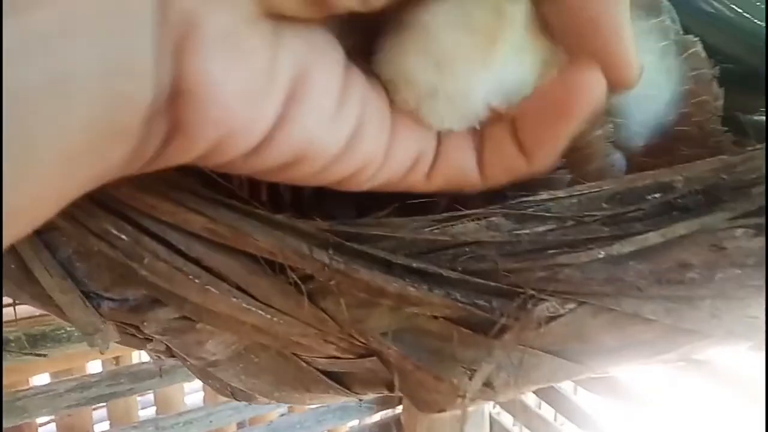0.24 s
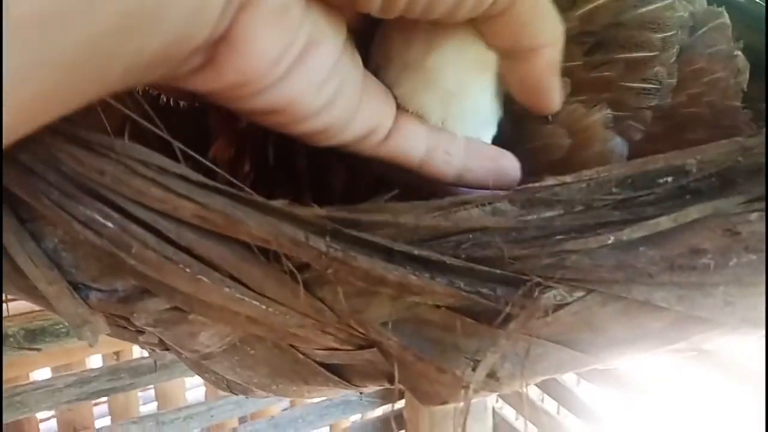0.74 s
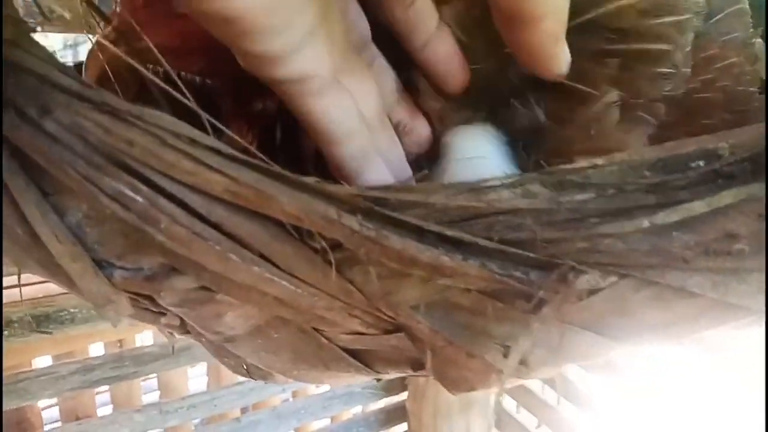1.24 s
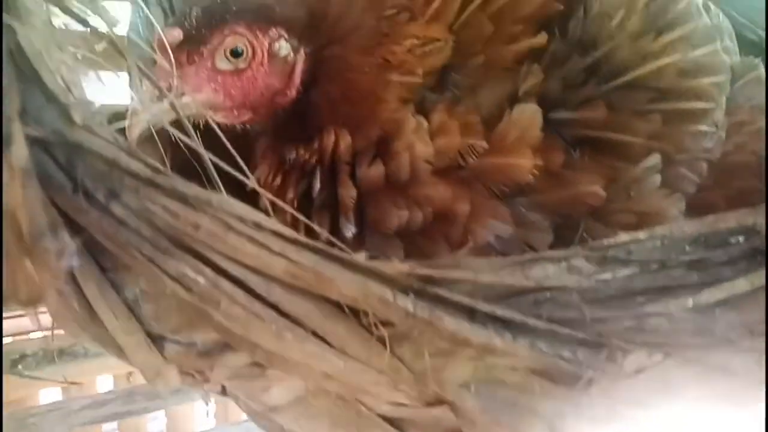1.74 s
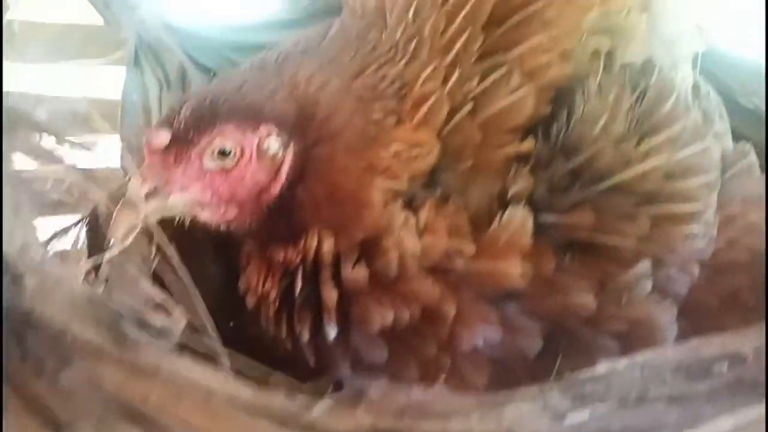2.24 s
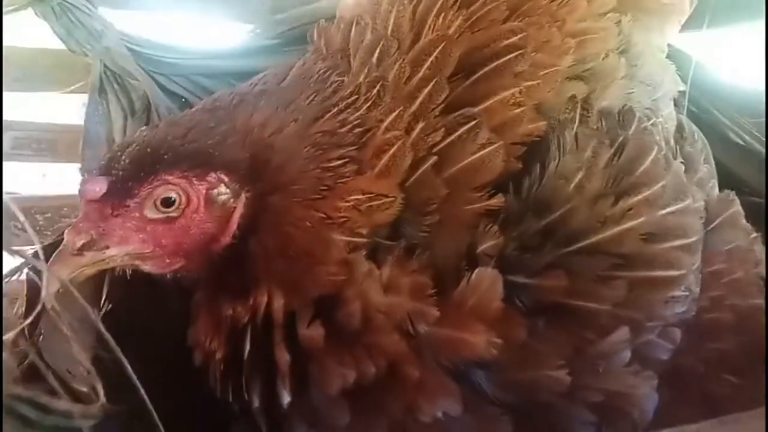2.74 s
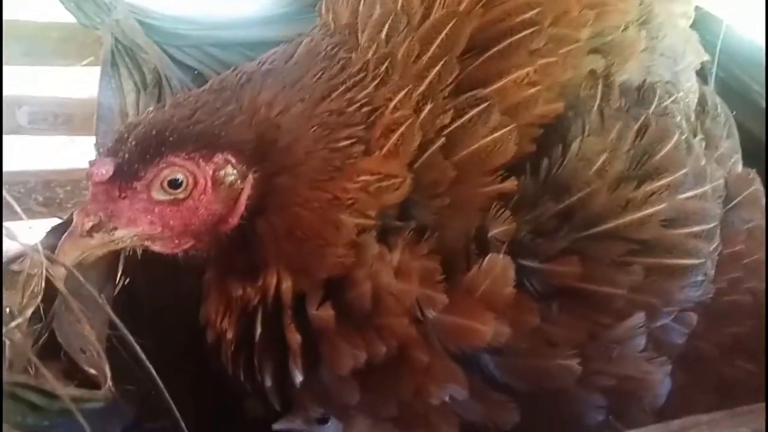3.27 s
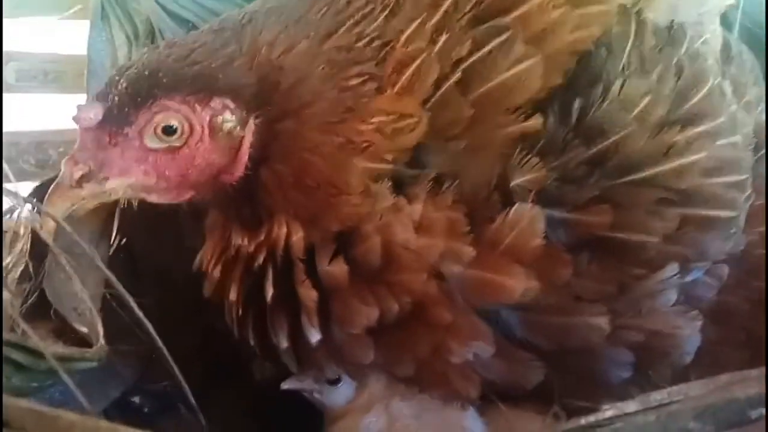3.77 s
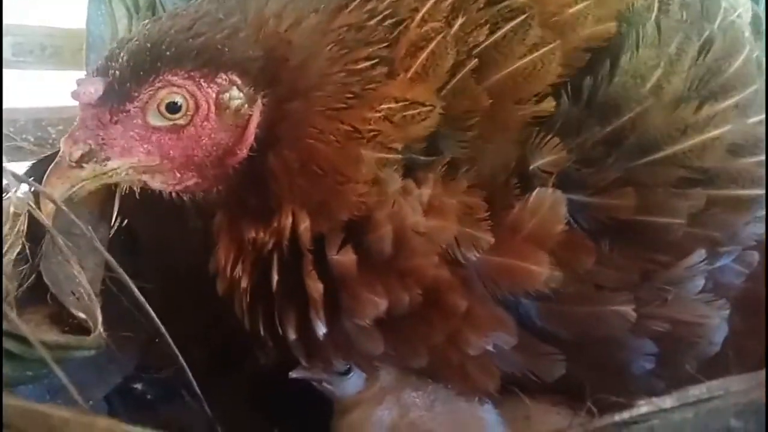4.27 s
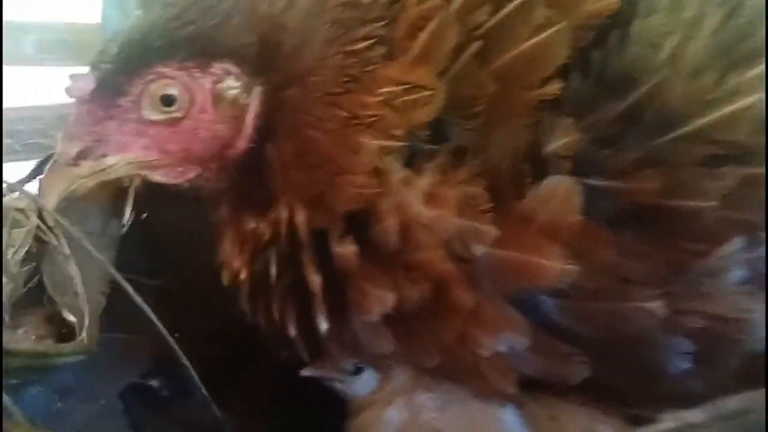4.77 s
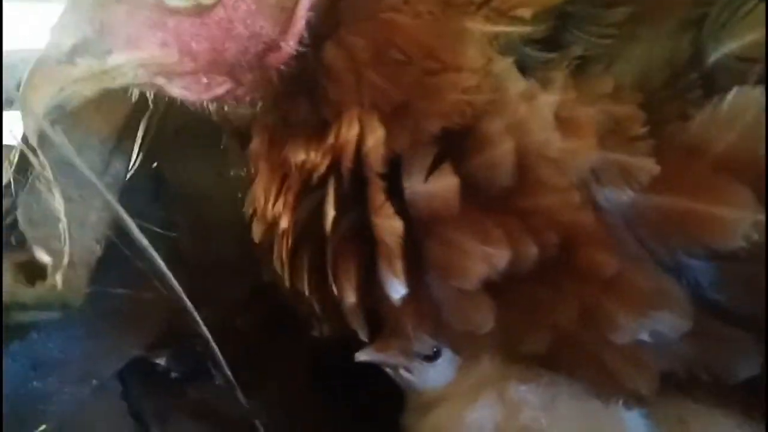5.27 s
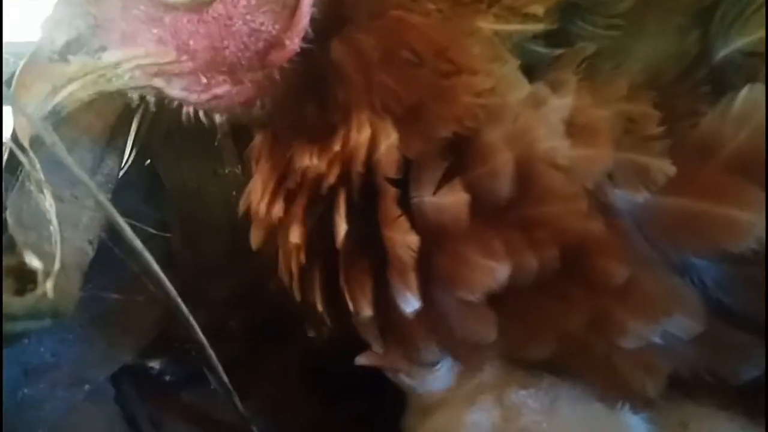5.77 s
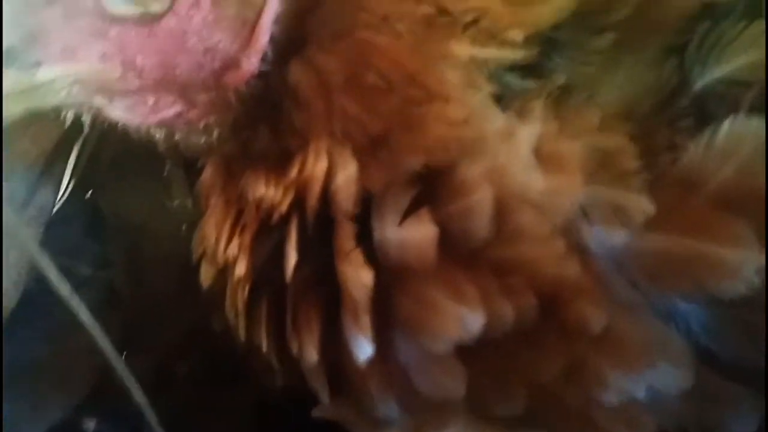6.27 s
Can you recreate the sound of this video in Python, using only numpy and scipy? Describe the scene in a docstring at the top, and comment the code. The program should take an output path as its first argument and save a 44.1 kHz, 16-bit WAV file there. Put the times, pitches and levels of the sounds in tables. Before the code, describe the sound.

A brooding hen gives one long harsh rattling growl, then three short throaty ones, amid snapping straw and rustling dry leaves, very close.

```python
"""A brooding hen growls four times in a nest of dry leaves, close to a small microphone.
Her voice is one tone that swings between dips and crests, mostly 50 to 60 times a second.
It is mostly loud in the dips and thin on the crests; overtones and breath ring in windpipe and beak.
Around the growls straw snaps (noise bursts set ringing) and leaves rustle (grainy filtered noise).
A chick peeps, birds call far off (fuzzy tones), an engine drones (stacked tones), the yard hums (noise)."""
import sys
import numpy as np
from scipy import signal
from scipy.fft import rfft, irfft
from scipy.io import wavfile
from scipy.ndimage import uniform_filter1d

SR = 44100
rng = np.random.default_rng(int(sys.argv[2]) if len(sys.argv) > 2 else 0)


def put_to_file(sound):
    """Save the sound as 16-bit audio at rate SR, in the file named by the first command-line argument."""
    columns = np.atleast_2d(sound).T  # one column per channel
    safe = np.clip(columns, -1, 1)
    whole_steps = np.round(safe * 32767)
    wavfile.write(sys.argv[1], SR, whole_steps.astype(np.int16))


N = 287091


def amp(db):
    """Turns a level in dB into a multiplier."""
    return 10 ** (np.asarray(db) / 20)


def evened(x):
    """Scales a signal to an average strength (rms) of 1."""
    return x / np.sqrt(np.mean(x ** 2) + 1e-20)


def add(mix, s, sound):
    """Mixes a sound in, starting at s seconds."""
    part = mix[round(s * SR):][:len(sound)]
    part += sound[:len(part)]


def wobble(size, span_s):
    """Smooth random drift of rms 1: noise averaged twice over span_s seconds."""
    span = max(int(span_s * SR), 1)
    smooth = uniform_filter1d(rng.standard_normal(size), span)
    return evened(uniform_filter1d(smooth, span))


def shaped(x, points):
    """Weights each frequency of a signal by a curve of (frequency [Hz], level [dB])."""
    hz, db = np.transpose(points)
    bins = np.fft.rfftfreq(x.shape[-1], 1 / SR)
    curve_db = np.interp(np.log(bins + 1), np.log(hz), db)
    return irfft(rfft(x) * amp(curve_db), x.shape[-1])


def coloured(size, points):
    """Noise whose spectrum follows the given curve, rms 1."""
    return evened(shaped(rng.standard_normal(size), points))


def resonate(x, hz, width):
    """A two-pole resonance: favours sound near hz, with gain 1 at its peak."""
    return signal.lfilter(*signal.iirpeak(hz, hz / width, SR), x)


def steep(x, hz, width):
    """Three equal resonances in a row leave dark valleys on both sides."""
    for _ in range(3):
        x = resonate(x, hz, width)
    return x


def warble(t, s, dip_hz, dip_db, pace, abrupt):
    """Counts the dips at the given pace; gives each moment the pitch and level of its nearest dip."""
    # dips that stand out, deep thumps or shallow chirps: (time [s], pitch [Hz], level [dB])
    accents = [(.214, 773, -11), (.234, 1220, -14), (.307, 775, -10.5), (.347, 757.3, -10),
               (.386, 762, -10), (.443, 1423, -12.5), (.464, 1368, -8), (.506, 775, -7.5),
               (.545, 1147, -18), (.562, 1375, -11), (.605, 813.7, -5.5), (.648, 824, -8),
               (.665, 1340, -9.5), (3.982, 825, -16.5), (4.019, 788, -12), (4.193, 768, -11.5),
               (5.67, 1202, -24.5), (5.735, 1362, -20.5), (5.768, 1232, -14.5), (5.821, 1333, -14),
               (5.844, 870, -15.5), (5.862, 900, -15.5), (5.878, 1231, -15), (5.956, 760, -3.5)]
    scatter, scatter_db = .08, 0.5  # chance spread of the other dips: share of the pitch, dB
    since, rate = np.transpose(pace)
    current_rate = rate[np.maximum(np.searchsorted(since, t) - 1, 0)]
    turn = np.cumsum(current_rate) / SR
    turn = np.maximum(turn - np.interp(since[0], t, turn), -.5)  # whole numbers are dips
    at = np.interp(np.arange(int(turn[-1]) + 2), turn, t)  # time of each dip
    chance = rng.standard_normal(len(at)) / np.interp(at, t, abrupt)  # abrupt flips land more truly
    hz = np.interp(at, s, dip_hz) * (1 + scatter * chance)
    db = np.interp(at, s, dip_db) - scatter_db * chance  # deeper dips are louder
    for when, accent_hz, accent_db in accents:
        if s[0] < when < s[-1]:
            k = np.argmin(abs(at - when))
            hz[k], db[k] = accent_hz, accent_db
    nearest = np.maximum(np.round(turn).astype(int), 0)
    return turn, hz[nearest], db[nearest]


def growl(rows, pace, rough, neck, *beak_db):
    """One tone swings between dips and crests; overtones and breath ring in windpipe and beak."""
    # stretches where the voice flips between two pitches: (start [s], end [s], abruptness [1 to 4.5])
    jumps = [(0, 0.131, 4.4), (0.709, .757, 2.7)]
    # overtones of the voice: (multiple of the pitch, level [dB])
    overtone_levels = [(2, -8), (3, -22), (4, -24.5), (5, -27.5)]
    # rings of the windpipe: (frequency [Hz] before the neck factor, width [Hz], level [dB])
    windpipe = [(1400, 3200, -10), (2590, 590, -5.5), (3350, 1100, -4), (3742, 500, 4)]
    # rings of the beak: (frequency [Hz] before the neck factor, width [Hz], level [dB] before beak_db)
    beak = [(5095, 240, -1.5), (6990, 750, -1.5)]
    # soft wide noise that swells under each growl, with some low rumble and high hiss:
    # (frequency [Hz], relative level per Hz [dB])
    under_spectrum = [(30, -10), (60, -2.5), (140, 3), (280, -4.5), (600, -14), (3000, -22), (5000, -26),
                      (8000, -19.5), (15500, -7.5)]

    s, dip_hz, dip_db, *columns = np.transpose(rows)
    t = np.arange(s[0], s[-1], 1 / SR)
    top_hz, top_db, breath_db = (np.interp(t, s, c) for c in columns)
    abrupt = np.full(len(t), 1.1)  # the usual swing is a glide
    for start, end, abruptness in jumps:
        abrupt[(t >= start) & (t < end)] = abruptness
    turn, dip_hz, dip_db = warble(t, s, dip_hz, dip_db, pace, abrupt)

    # pitch: abrupt swings jump, gentle ones glide
    swing = np.sin(np.pi * turn) ** 2  # 0 in a dip, 1 on a crest
    power = np.clip(abrupt, 1, 4.5)
    up, down = swing ** power, abs(1 - swing) ** power
    height = up / (up + 0.65 * down)
    jitter = 1 + .13 * rough / power * wobble(len(t), .0016)
    hz = (dip_hz + (top_hz - dip_hz) * height) * jitter
    phase = 2 * np.pi * np.cumsum(hz) / SR

    # loudness: each dip builds slowly and drops quickly, louder as the pitch climbs back
    lean = 1 + 0.2 * np.sin(2 * np.pi * turn)
    dip = amp(dip_db) * abs(1 - swing) ** (1.5 / power ** 0.097) * (1 - height) ** 1.2 * lean
    crest = amp(top_db + 12 * rough * wobble(len(t), .0018) / power)  # the thin crest breaks up
    level = dip + crest * height ** 0.42
    level = level * amp(1.7 * rough / power * wobble(len(t), 0.001))

    octave = np.sin(2 * phase + wobble(len(t), .002))
    escaped = amp(-12) * (1 - height) / power * octave  # the octave that escapes the windpipe
    # slack folds skip every other beat: half pitch, strongest where the crest pitch is low
    slack = amp(-6.5 - np.maximum(top_hz - 950, 0) / 14)
    half_pitch = slack * (np.sin(phase / 2) + 0.49 * np.sin(3 * phase / 2))
    tone = np.sin(phase) + escaped + half_pitch

    flutter = 1 - rough + rough * wobble(len(t), .0004)
    stack = sum(amp(db) * np.sin(k * phase) for k, db in overtone_levels)
    overtones = level * flutter * amp(-8 * height) * stack
    gusts_db = 2.5 * wobble(len(t), .004)
    puffs = amp(breath_db + gusts_db) * (level / amp(top_db)) ** 0.33  # breath swells with the voice
    drive = overtones + puffs * rng.standard_normal(len(t))

    pipe = sum(amp(db) * steep(drive, f * neck, w) for f, w, db in windpipe)
    gape = amp(0.54 * (breath_db - breath_db.max()))  # the beak opens with the breath
    for (f, w, db), more in zip(beak, beak_db):
        pipe += gape * amp(db + more) * steep(drive, f * neck, w)
    small_body = signal.butter(4, 400, "high", fs=SR, output="sos")  # radiates little bass
    under_noise = amp(0.088 * breath_db - 44.0) * coloured(len(t), under_spectrum)
    sound = signal.sosfilt(small_body, level * tone) + pipe + under_noise
    return s[0], sound * signal.windows.tukey(len(t), .01)


def nest(x):
    """Quick reflections from the nest walls: a short fading noise tail with one strong echo."""
    gap = int(.003 * SR)
    t = np.arange(gap, int(.1 * SR)) / SR
    tail = np.r_[np.zeros(gap), rng.standard_normal(len(t)) * amp(-60 * t / .07)]
    tail[int(.006 * SR)] += 14  # the strong echo, 6 ms late
    tail = resonate(tail, 1400, 3000)
    return signal.fftconvolve(x, tail / np.linalg.norm(tail))[:N]


def hen():
    """Places the four growls and lets the nest walls send a little of them back."""
    # the voice, one table a growl:
    # (time [s], dip pitch [Hz], dip level [dB], crest pitch [Hz], crest level [dB], breath level [dB])
    growls = [
        [(0, 1682, -4, 2540, -13.5, -20), (.06, 1690, -2, 2480, -13.5, -20), (.095, 1632, 1, 1950, -21, -26),
         (.126, 1613, -10.5, 1957, -10, -19), (.139, 900, -18, 1900, -13, -27),
         (.17, 946, -18.5, 1500, -16.5, -31), (.2, 967.3, -12, 1930, -23, -34),
         (.3, 909.4, -19.5, 1870, -19, -31), (.42, 911.7, -13.5, 2015, -19.5, -28.5),
         (.52, 878.3, -13, 1857, -14.5, -26.5), (.69, 851.3, -13.5, 1816, -13, -24),
         (.713, 1080, -22.5, 1306, -7, -24.5), (.75, 805, -17, 1262, -10.5, -32),
         (.77, 805.6, -13, 991, -33, -51.5), (.805, 922, -14, 903, -38, -40),
         (.875, 793, -26.5, 774, -61.5, -70.5)],
        [(1.925, 795, -23, 1150, -33, -69), (1.945, 722, -17, 1258, -29, -42), (1.97, 860, -25, 1305, -39, -40),
         (2.0, 860, -20, 1294, -29, -44), (2.03, 732, -14.5, 1298, -32.5, -39),
         (2.065, 690, -18.5, 1212, -26.5, -49), (2.09, 590, -25, 837, -25, -65),
         (2.125, 496, -61, 550, -42.5, -60)],
        [(3.912, 877, -25.5, 1507, -54.5, -65.5), (3.96, 1018, -21.5, 1598, -52, -53),
         (3.975, 1057, -29, 1678, -32.5, -41), (4.03, 867, -18.5, 2193, -25.5, -37.5),
         (4.065, 886, -15, 1946, -44, -44), (4.095, 1229, -18, 2056, -36.5, -38),
         (4.148, 1145, -6.5, 2040, -28.5, -28.5), (4.175, 836, -12.5, 1784, -24.5, -37),
         (4.255, 804, -13.5, 1876, -34, -41), (4.278, 767.5, -16, 1082, -20, -40),
         (4.3, 808, -39, 916, -60.5, -48)],
        [(5.617, 1081, -29, 1327, -59, -62), (5.645, 1000, -15.5, 1412, -55, -57),
         (5.66, 959, -19.5, 2404, -33.5, -41), (5.68, 880, -17.5, 1671, -26.5, -40),
         (5.76, 920, -18, 2048, -22.5, -39.5), (5.8, 890, -15, 2255, -22.5, -41),
         (5.89, 1067, -12.5, 2111, -21, -37.5), (5.935, 1190, -5.5, 1988, -24.5, -33.5),
         (5.97, 1042, -17.5, 1814, -24.5, -35), (5.985, 697, -29, 1177, -18, -36.5),
         (6.005, 497, -43, 880, -56, -64.5)],
    ]
    # warble pace, one table a growl, counted from its first dip: (start [s], dips per second [1/s])
    paces = [
        [(.023, 50), (.123, 55), (.287, 50), (.687, 54.3), (.779, 100), (.809, 42)],
        [(1.937, 57)],
        [(3.915, 59.5), (3.999, 52.5), (4.152, 50.5)],
        [(5.62, 61.9), (5.749, 53.6)],
    ]
    # roughness of each growl [0 to 1]
    roughness = [.36, .36, .33, .28]
    # one row a growl: (neck factor on the rings, beak ring near 5 kHz [dB], beak ring near 7 kHz [dB])
    beaks = [(.96, -4, -4), (0.922, -5, -11), (0.958, -5, -16), (0.987, 1.5, -15)]
    voice = np.zeros(N)
    for rows, pace, rough, beak in zip(growls, paces, roughness, beaks):
        add(voice, *growl(rows, pace, rough, *beak))
    return voice + amp(-21) * nest(voice)


def yard():
    """The outdoor hum: noise that swells gently, with faint random ticks of straw."""
    # spectrum of the hum: (frequency [Hz], relative level per Hz [dB])
    spectrum = [(25, -30.5), (45, -17.5), (90, 2), (200, -5), (350, -8.5), (650, -14.5), (1150, -17.5),
                (2500, -19.5), (4000, -28), (16000, -28)]
    hum = amp(-63.5 + 1.2 * wobble(N, 0.1)) * coloured(N, spectrum)
    loudness = amp(4.4 * np.minimum(rng.exponential(1, N), 3))
    ticks = (rng.random(N) < 12 / SR) * loudness  # about 12 a second
    fade = amp(-60 * np.arange(600) / SR / .02)
    tick = resonate(rng.standard_normal(600) * fade, 3000, 2500)
    return hum + amp(-71) * signal.oaconvolve(ticks, tick)[:N]


def engine():
    """A distant engine: tones at multiples of a wavering firing rate, each drifting in level."""
    # course of the engine: (time [s], firing rate [Hz] before wavering, level [dB])
    course = [(0, 107.4, -69), (0.45, 112, -58), (0.898, 109, -66.5), (1.5, 107, -73.5),
              (2.299, 99.7, -67.5), (2.698, 103.4, -67.5), (3.1, 102.5, -84), (3.498, 99, -70.5),
              (3.8, 100.4, -81), (6.51, 101.6, -91)]
    # mean level of each multiple of the firing rate, lowest first [dB]
    order_levels = [1.5, -5.5, -6.5, -3, -2.5, -2.5, -8, -11]
    s, hz, db = np.transpose(course)
    t = np.arange(N) / SR
    rate = np.interp(t, s, hz) * (1 + 0.019 * wobble(N, 0.09))
    phase = 2 * np.pi * np.cumsum(rate) / SR
    orders = np.zeros(N)
    for k, order_db in enumerate(order_levels, 1):
        orders += amp(order_db + 3.3 * wobble(N, 0.2)) * np.sin(k * phase)
    return amp(np.interp(t, s, db)) * orders


def rustle(s, length, db, hz, width, hiss_db):
    """A slide of leaves or a rumble: grainy hiss with a hollow tone, quick to rise, slower to fade."""
    u = np.linspace(0, 1, int(1.77 * length * SR))
    noise = rng.standard_normal(len(u)) * amp(2.4 * wobble(len(u), 0.00067))
    hollow = evened(resonate(resonate(noise, hz, width), hz, 2 * width))
    hiss = evened(resonate(resonate(noise, 1600, 3200), 1200, 4700))
    shape = evened(u ** 0.88 * (1 - u) ** 3.08)
    return s, amp(db) * (hollow + amp(hiss_db) * hiss) * shape


def rustles():
    """Places the slides of the dry leaves, and one faint low rumble at 6.05 s."""
    # (time [s], length [s] before stretching 1.77 times, level [dB], hollow pitch [Hz],
    #  width of that pitch [Hz], hiss relative to the hollow tone [dB])
    rows = [(0.866, 0.038, -59, 956, 914, 6.5), (1.044, 0.051, -77.5, 2400, 890, 8.5),
            (1.218, 0.058, -53.5, 2770, 890, -4), (1.367, 0.1, -66.5, 3210, 1250, 8.5),
            (1.375, 0.036, -56, 5880, 2535, -3), (1.417, 0.02, -62, 4600, 2510, 6),
            (1.478, 0.051, -64, 6280, 1995, -3), (1.615, 0.068, -69.5, 1893, 906, -1),
            (2.117, 0.037, -62.5, 4540, 1510, 4), (2.195, 0.033, -56, 345, 298, -2.5),
            (2.424, 0.019, -69.5, 2840, 905, 8), (2.595, 0.045, -74, 3100, 399, -13.5),
            (3.073, 0.095, -78.5, 2740, 500, -11), (3.198, 0.19, -65.5, 305.3, 297.5, -16),
            (3.503, 0.24, -70.5, 540, 305.3, -9.5), (4.287, 0.049, -63.5, 2620, 890, -3.5),
            (4.723, 0.077, -62.5, 921, 505, 1), (4.85, 0.097, -54, 790, 300, -4.5),
            (5.014, 0.085, -61, 700, 249, -11), (5.22, 0.065, -71.5, 2969, 879, -3.5),
            (5.985, 0.052, -67.5, 1490, 910, 8), (6.329, 0.058, -79, 2640, 1217, -11),
            (6.05, .24, -75, 158, 150, -22.5), (6.442, 0.11, -78, 2386, 885, 5)]
    mix = np.zeros(N)
    for row in rows:
        add(mix, *rustle(*row))
    return mix


def snap(s, db, hz, knock_hz, knock_db):
    """A stalk breaks: a sharp tick, a short ring at its pitch and a dull knock of the nest."""
    t = np.arange(int(.12 * SR)) / SR
    rise = np.minimum(t / .0008, 1) ** 2
    fade = amp(-60 * t / .008) + .1 * amp(-60 * t / .075)  # 60 dB down in 8 ms, and a weak 75 ms tail
    burst = rng.standard_normal(len(t)) * rise * fade
    burst[int(.001 * SR)] += 2.5  # the break itself
    tick = resonate(resonate(burst, hz, 0.14 * hz), hz, hz) + 0.44 * resonate(burst, 4500, 4000)
    knock = resonate(resonate(burst, knock_hz, 426), knock_hz, 660)
    knock += 0.89 * resonate(resonate(burst, 400, 330), 450, 470)
    return s, amp(db) * (tick / abs(tick).max() + amp(knock_db) * knock / abs(knock).max())


def snaps():
    """Places every snap of the straw."""
    # (time [s], tick peak level [dB], pitch [Hz], knock pitch [Hz], knock peak relative to the tick [dB])
    breaks = [(0.955, -48, 4160, 800, -15), (1.2301, -15.5, 2653, 1562, -31.5),
              (1.3357, -21, 3577, 1403, -3), (1.4669, -39, 1826, 565, -13), (1.5555, -45, 1833, 365, -11.5),
              (1.89, -52.5, 2105, 684, 20), (2.2043, -44, 2814, 370, -6.5), (2.3445, -49, 1900, 407, -25),
              (2.4152, -30, 3383, 626, -30), (2.5502, -54, 4015, 597, -10),
              (3.1626, -37.5, 4670, 623.3, -21), (3.6289, -43.5, 2105, 628.6, -9.5),
              (3.7549, -53.5, 2704, 351, -13), (3.8675, -61, 2007, 461, 15.5),
              (5.4031, -43.5, 3470, 381, -21), (5.4348, -43, 2230, 568, -13.5),
              (5.5803, -59, 2140, 782, 16.5), (5.9746, -27, 1745, 1147, 1.5), (6.2857, -46, 3270, 441, -9),
              (6.3474, -45, 3510, 1598, -25.5), (6.3677, -23, 3030, 1746, -52.5)]
    mix = np.zeros(N)
    for row in breaks:
        add(mix, *snap(*row))
    return mix


def far_note(rows):
    """A small call: a slightly fuzzy tone with a weak octave."""
    s, hz, db = np.transpose(rows)
    t = np.arange(s[0], s[-1], 1 / SR)
    fuzzy_hz = np.interp(t, s, hz) * (1 + 0.0062 * wobble(len(t), 0.0038))
    phase = 2 * np.pi * np.cumsum(fuzzy_hz) / SR
    level = np.sqrt(2) * amp(np.interp(t, s, db) + 2.5 * wobble(len(t), .008))
    tone = np.sin(phase) + amp(-19.5) * np.sin(2 * phase)
    return s[0], level * tone * signal.windows.tukey(len(t), .2)


def far_calls():
    """Places the chick's peep, the far calls in the yard and the low coos."""
    # a chick's peep, then far calls, one table a note: (time [s], pitch [Hz], level [dB])
    calls = [
        [(1.388, 3360, -65), (1.402, 3270, -52), (1.415, 3880, -55)],
        [(1.6, 1330, -72), (1.635, 1406, -57.5), (1.67, 1430, -75.5)],
        [(1.73, 1400, -65), (1.76, 1520, -59.5), (1.81, 1404, -59), (1.85, 1420, -67.5), (1.92, 1360, -56)],
        [(2.08, 1514, -52), (2.15, 1472, -47), (2.19, 1382, -68.5), (2.23, 1300, -65.5)],
        [(2.8, 1166, -63.5), (2.84, 1136, -78)],
        [(4.53, 1030, -79.5), (4.58, 1035, -75.5), (4.72, 1014, -80)],
    ]
    # soft low coos far off, one table a note: (time [s], pitch [Hz], level [dB])
    coos = [
        [(2.24, 585, -71), (2.34, 593, -65.5), (2.36, 584, -81)],
        [(2.39, 605.6, -80.5), (2.408, 597, -60), (2.47, 608, -87.5)],
        [(2.51, 584, -69), (2.574, 599, -65.5), (2.61, 560, -87)],
        [(2.64, 623, -68.5), (2.734, 573, -71.5), (2.76, 642, -78)],
    ]
    mix = np.zeros(N)
    for rows in calls + coos:
        add(mix, *far_note(rows))
    return mix


def scene():
    """Hen, yard, engine, leaves, straw and far calls together, as one channel."""
    mix = hen() + yard() + engine() + rustles() + snaps() + far_calls()
    return mix[None]


def record(dry):
    """A microphone weak in deep bass and dull above 4 kHz, its own hiss, then a cut at 15.5 kHz."""
    # response of the microphone: (frequency [Hz], level [dB])
    response = [(20, -30), (70, -6), (4200, -1.5), (5200, -10.5), (7500, -18.5), (16000, -30)]
    heard = shaped(dry, response)
    heard += amp(-84) * rng.standard_normal(dry.shape)  # hiss
    low_pass = signal.firwin(511, 15500, window=("kaiser", 9), fs=SR)
    return signal.oaconvolve(heard, low_pass[None], "same")


dry = scene()
out = record(dry)
put_to_file(out)
```